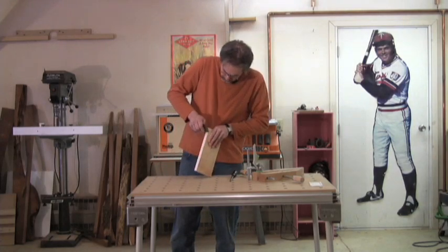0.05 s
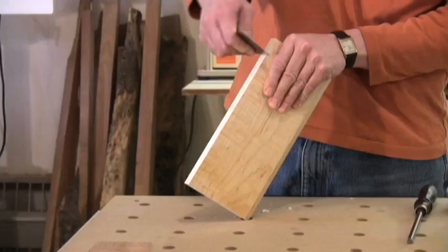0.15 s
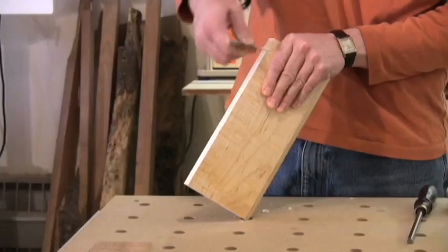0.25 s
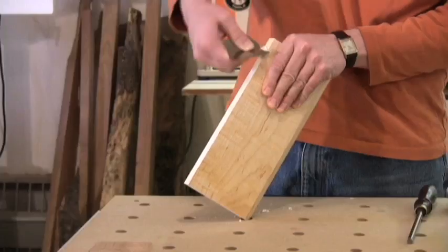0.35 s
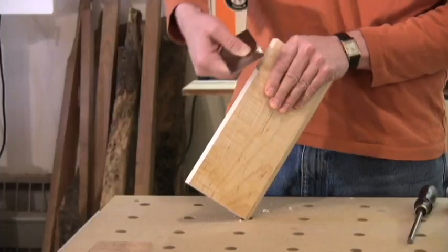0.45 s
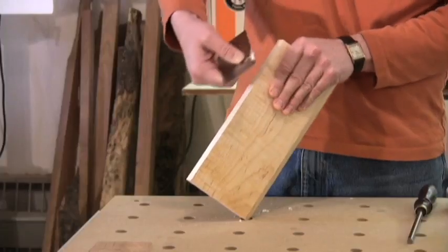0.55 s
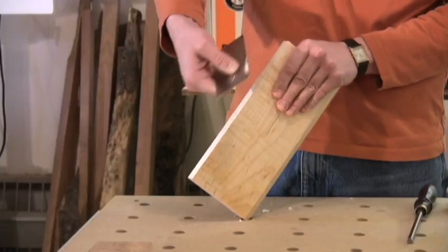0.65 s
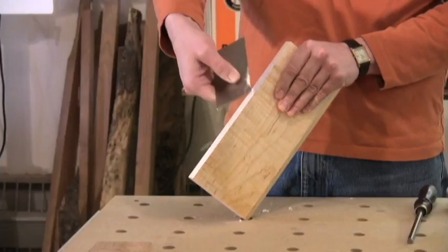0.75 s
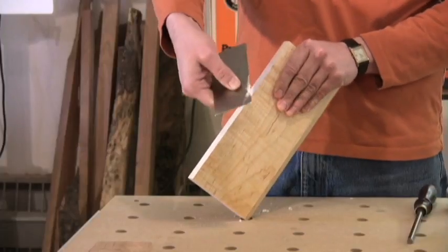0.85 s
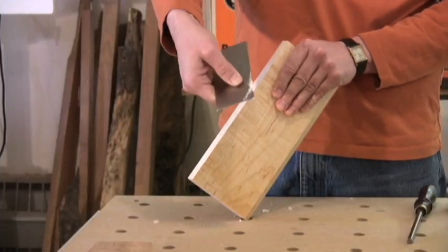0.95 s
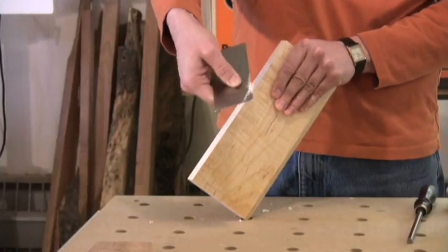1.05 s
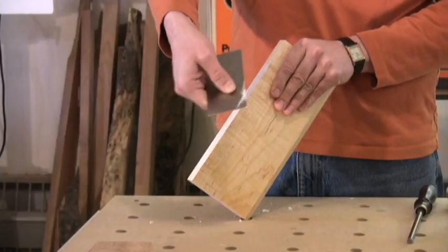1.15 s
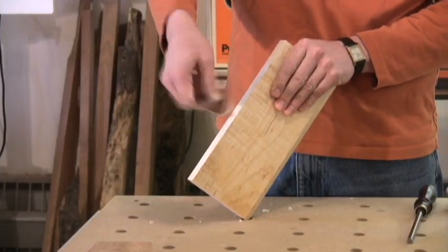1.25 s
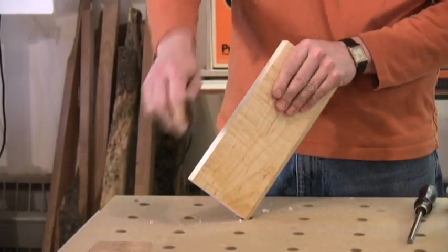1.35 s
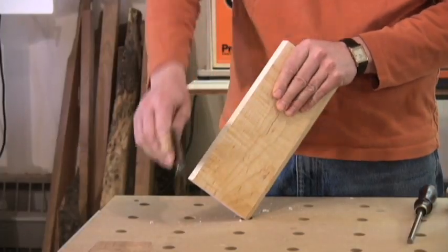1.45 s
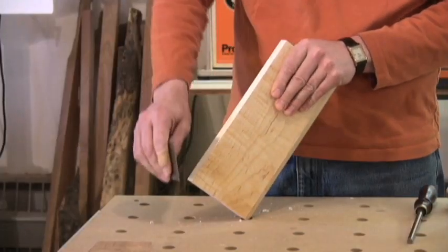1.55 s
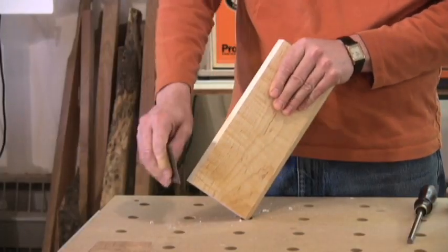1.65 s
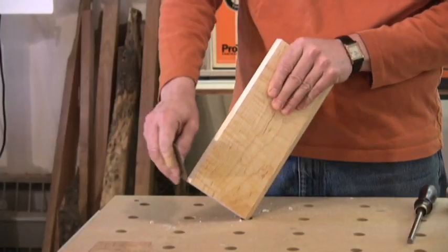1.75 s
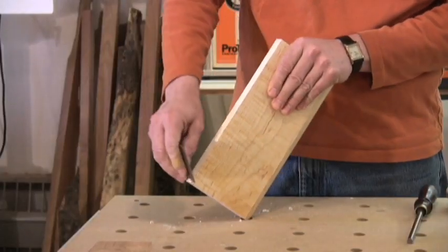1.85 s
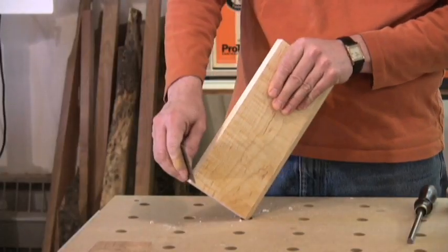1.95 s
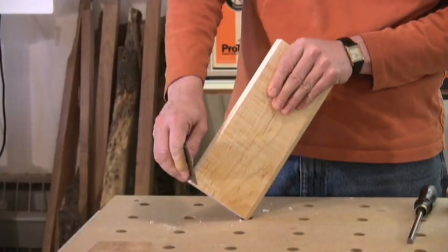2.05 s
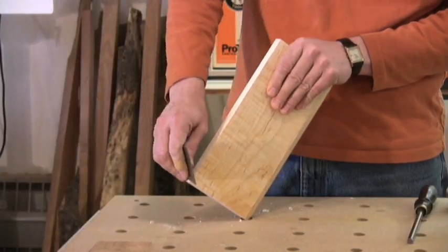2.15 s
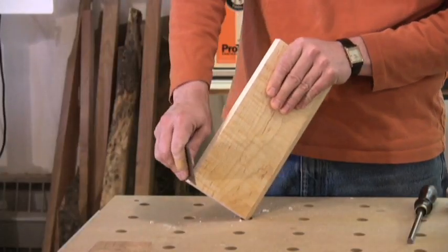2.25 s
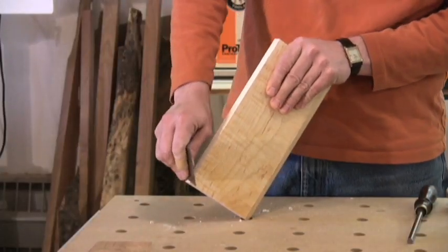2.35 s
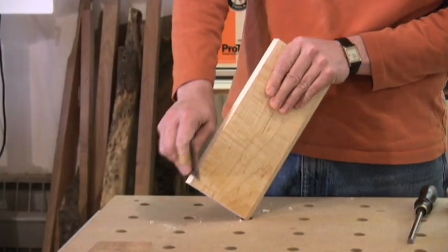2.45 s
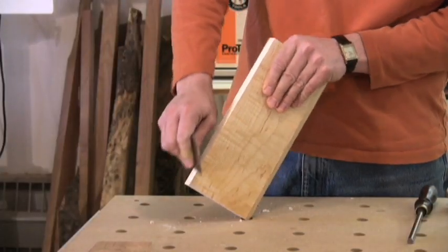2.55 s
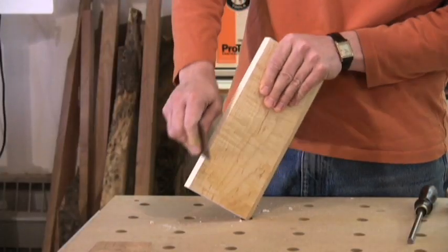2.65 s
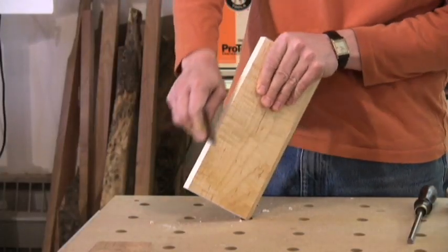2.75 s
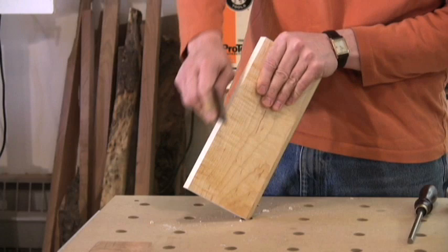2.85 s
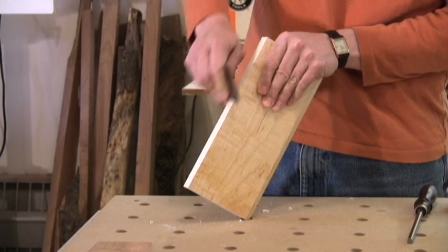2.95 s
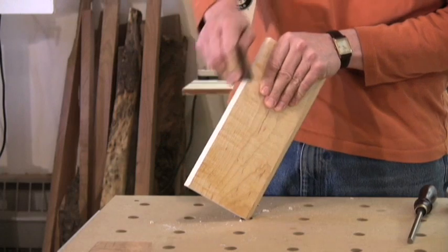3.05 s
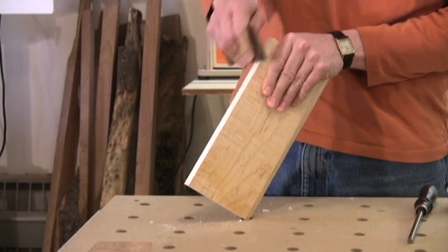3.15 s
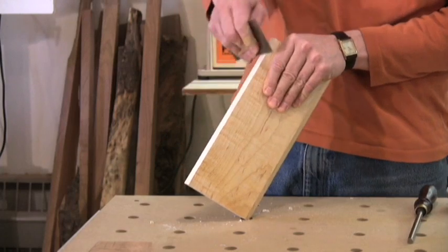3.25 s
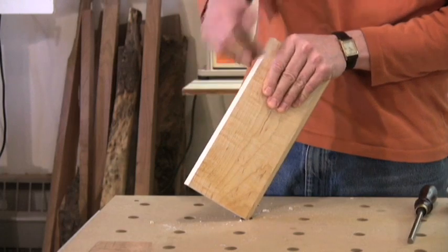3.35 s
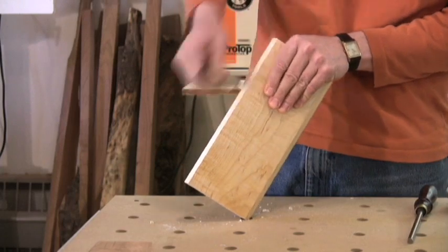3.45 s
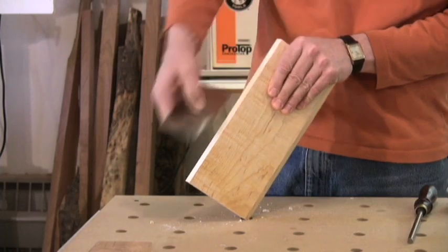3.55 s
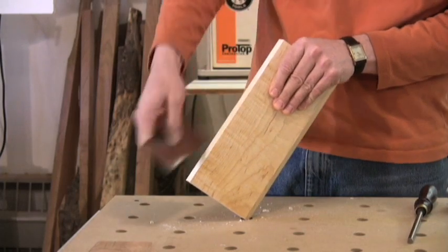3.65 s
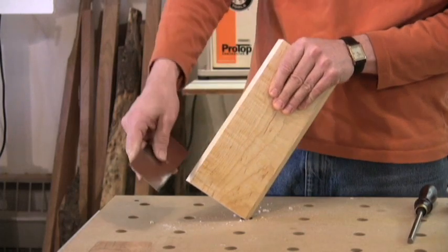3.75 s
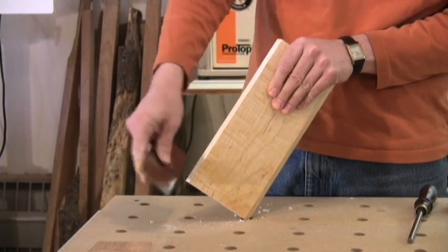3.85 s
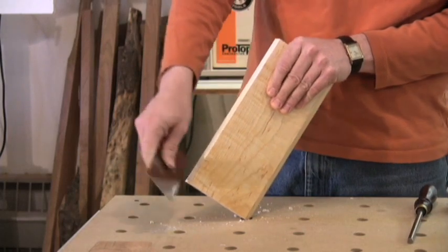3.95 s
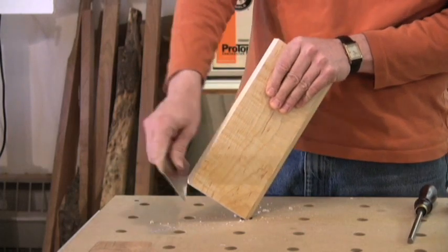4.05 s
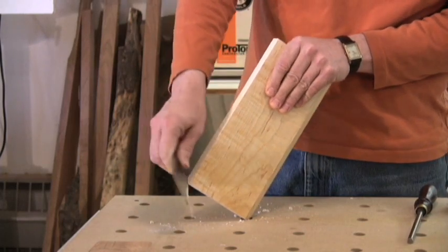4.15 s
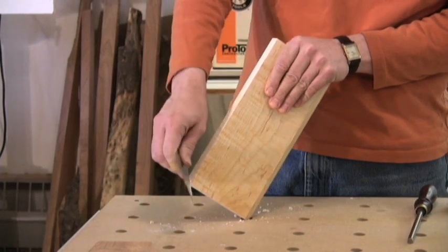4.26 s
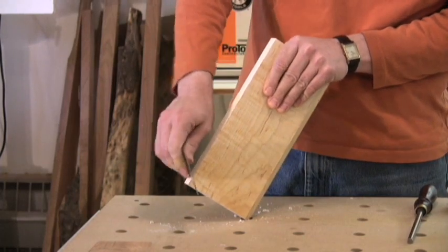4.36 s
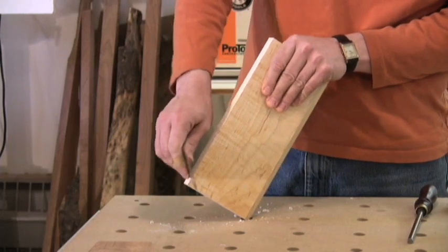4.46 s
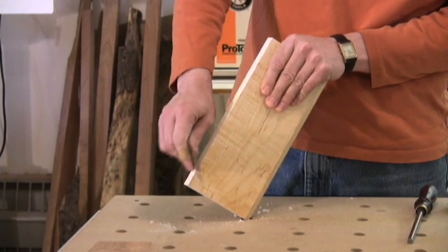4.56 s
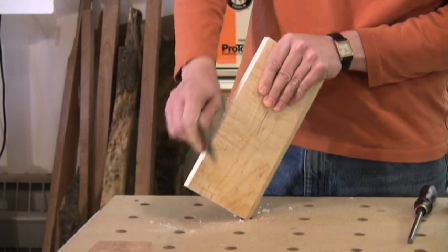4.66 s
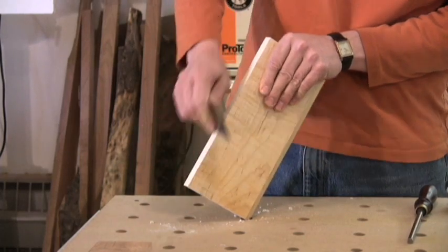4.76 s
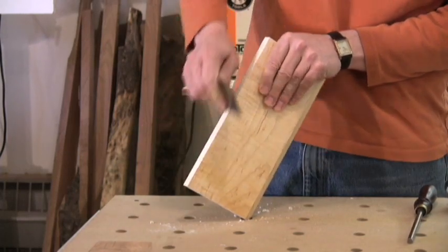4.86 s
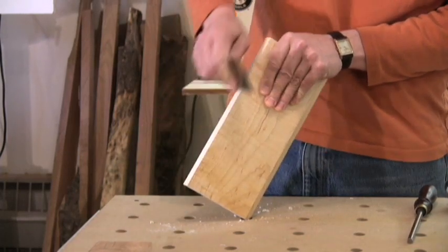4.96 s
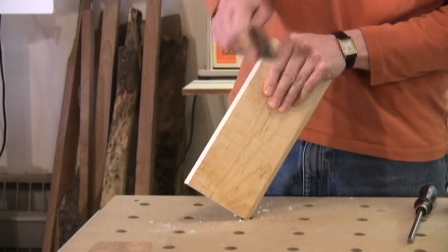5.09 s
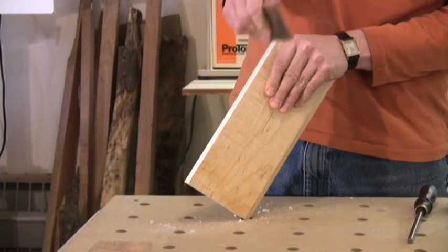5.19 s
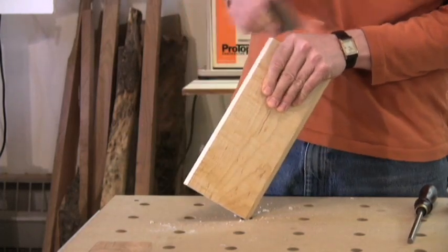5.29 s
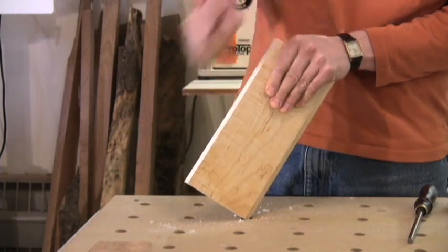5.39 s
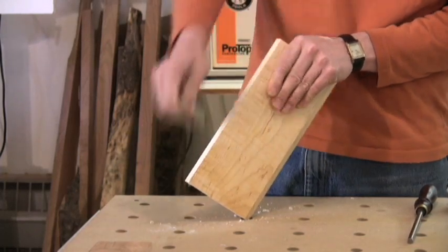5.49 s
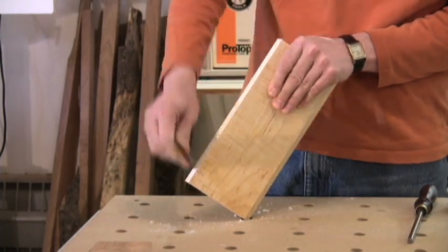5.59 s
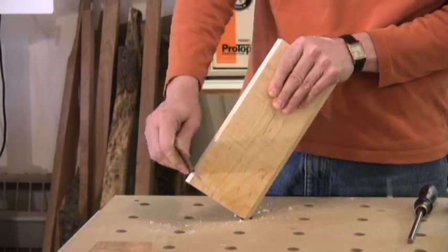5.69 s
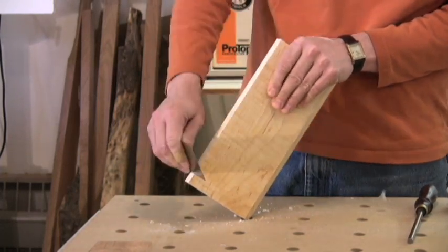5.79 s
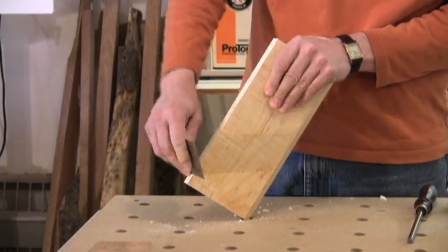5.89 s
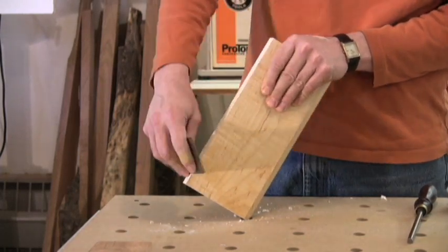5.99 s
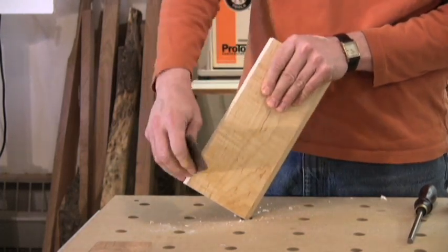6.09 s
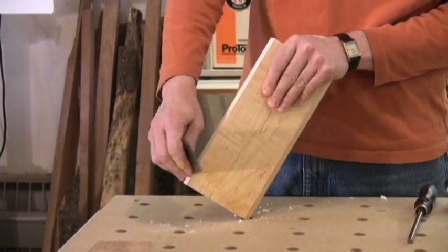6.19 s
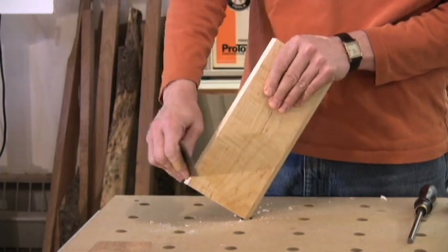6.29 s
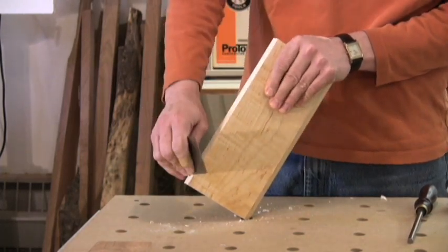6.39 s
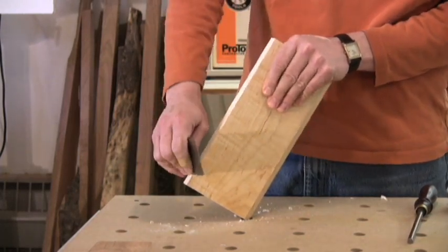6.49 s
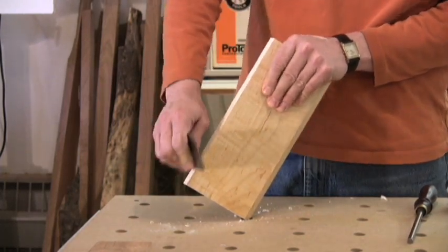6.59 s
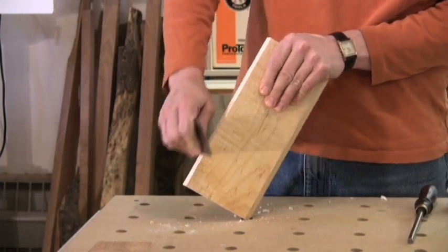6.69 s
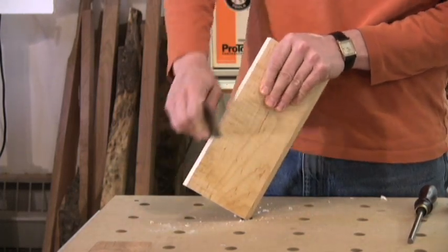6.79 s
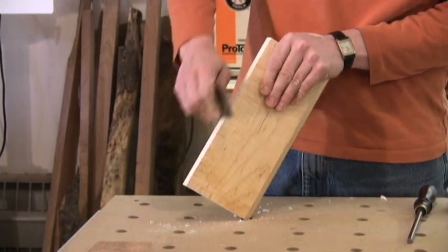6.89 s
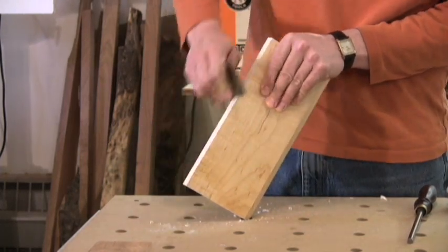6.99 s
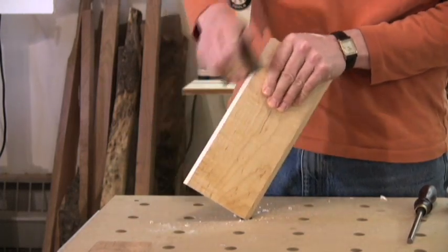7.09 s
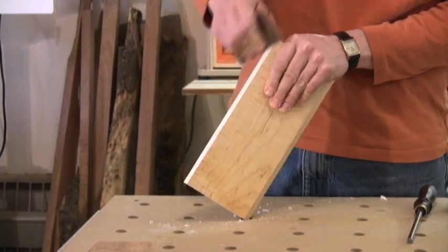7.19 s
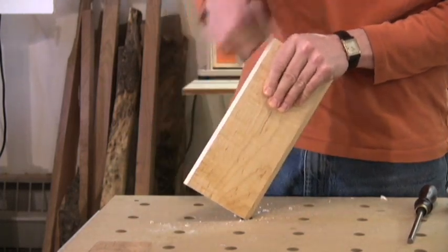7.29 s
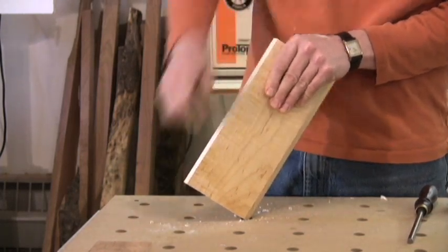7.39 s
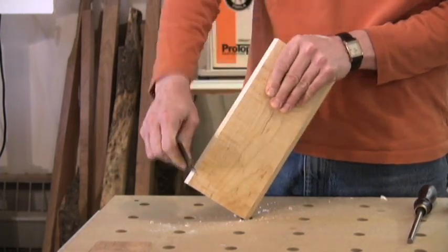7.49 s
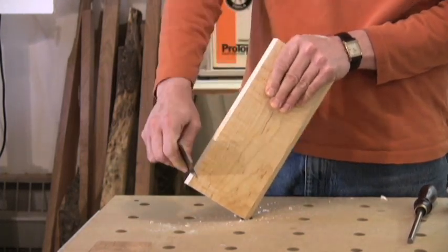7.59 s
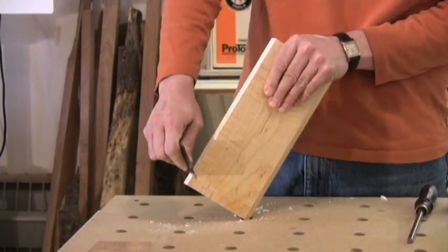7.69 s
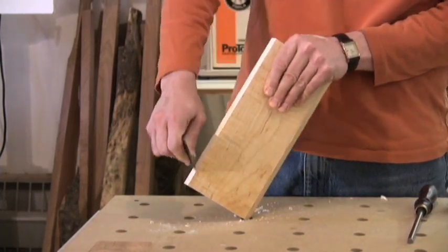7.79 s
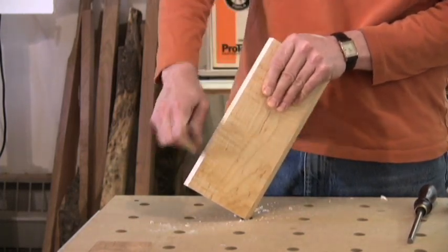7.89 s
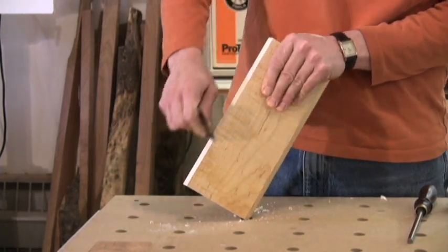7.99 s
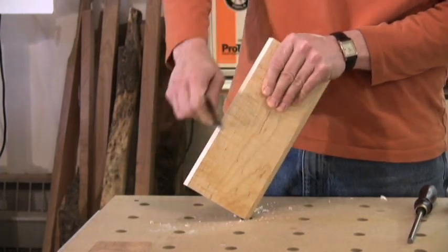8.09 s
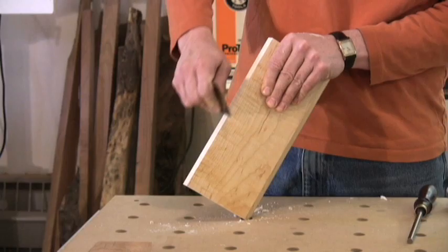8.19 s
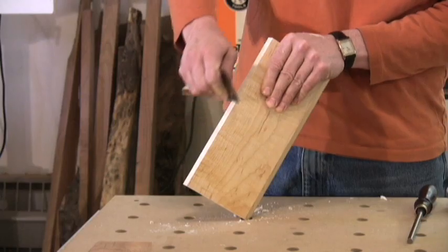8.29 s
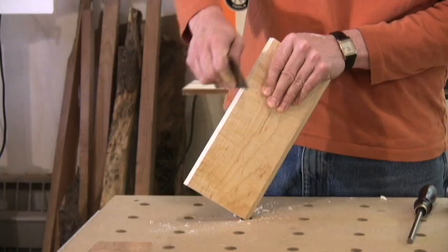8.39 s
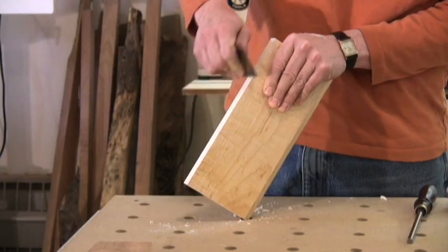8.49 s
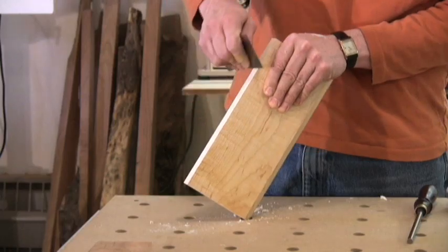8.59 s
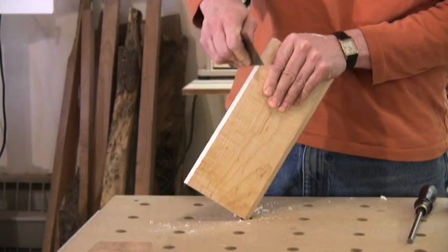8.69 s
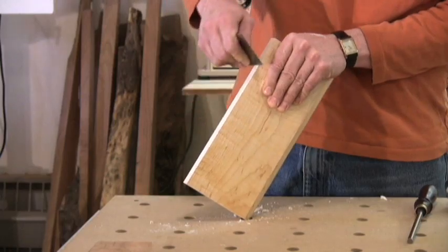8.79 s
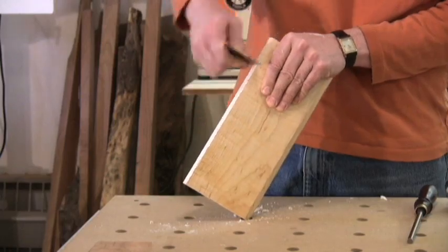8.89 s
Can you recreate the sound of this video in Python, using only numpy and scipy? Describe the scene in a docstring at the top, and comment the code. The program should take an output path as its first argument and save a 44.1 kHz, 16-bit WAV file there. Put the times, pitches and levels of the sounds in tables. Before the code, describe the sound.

A thin steel scraper rasps along a hardwood edge in four strokes, with blade knocks, small squeaks and soft clothing rustle between them, close up.

```python
"""A steel card scraper is pulled along the edge of a hardwood board that stands on a workbench.
Fibres tear in dense tiny snaps that sound the board, the flexed blade and the hissing shaving.
Around the strokes the steel knocks, chatters and squeaks on the wood, and fingers slide over it.
A close mono microphone with a fast limiter also hears clothing rustles and bumps, a faint hum,
steady air and the workshop's echo."""
import sys
import numpy as np
from scipy import signal
from scipy.fft import rfft, irfft, next_fast_len
from scipy.io import wavfile
from scipy.ndimage import uniform_filter1d, minimum_filter1d, map_coordinates

SR = 44100
rng = np.random.default_rng(int(sys.argv[2]) if len(sys.argv) > 2 else 0)


def inscribe(sig):
    """Save sig as 16-bit PCM at rate SR to the path in sys.argv[1].

    A 1-D sig is mono; a 2-D sig holds one channel per row.
    Samples are clipped to [-1, 1] before scaling.
    """
    pcm = np.round(np.clip(np.atleast_2d(sig).T, -1, 1) * 32767)
    wavfile.write(sys.argv[1], SR, pcm.astype(np.int16))


N = 394254


def amp(db):
    """Decibels to gain."""
    return 10 ** (np.asarray(db) / 20)


def unit(x):
    """Scale to rms 1."""
    return x / np.sqrt(np.mean(x ** 2) + 1e-20)


def noise(size):
    """White noise at rms 1."""
    return rng.standard_normal(size)


def along(points, hz):
    """Read (frequency [Hz], value) points on a log frequency axis."""
    f, v = np.transpose(points)
    return np.interp(np.log(hz + 1), np.log(f + 1), v)


def wobble(rate, size):
    """A smooth random curve with rate knots a second."""
    knots = rng.standard_normal(int(size * rate / SR) + 4)
    return map_coordinates(knots, [np.arange(size) * rate / SR])


def bell(offset, width):
    """A Gaussian swell that peaks at 1 where the offset is zero."""
    return np.exp(-.5 * (offset / width) ** 2)


def swells(rows):
    """A gain curve with one bell for each (time [s], level [dB], bell width [s]) row."""
    t = np.arange(N) / SR
    return sum(amp(db) * bell(t - s, width) for s, db, width in rows)


def filtered(x, response):
    """Filter x by a complex response of frequency."""
    m = next_fast_len(len(x) + SR // 4)
    return irfft(rfft(x, m) * response(np.fft.rfftfreq(m, 1 / SR)), m)[:len(x)]


def coloured(x, spectrum):
    """Shape x by a (frequency [Hz], level [dB]) spectrum, at rms 1."""
    return unit(filtered(x, lambda hz: amp(along(spectrum, hz))))


def resonate(x, modes):
    """Ring x through (frequency [Hz], width [Hz], level [dB]) resonances, at rms 1."""
    def response(f):
        return sum(amp(db) * 1j * f * w / (c * c - f * f + 1j * f * w) for c, w, db in modes)
    return unit(filtered(x, response))


def add(track, s, sound):
    """Mix a sound into the track at s seconds."""
    start = max(round(s * SR), 0)
    part = track[start:start + len(sound)]
    part += sound[:len(part)]


def peak_lift(hz, centre_hz, width_hz, lift_db):
    """Gain of a rounded boost around a centre frequency."""
    return amp(lift_db / (1 + ((hz - centre_hz) / width_hz) ** 2))


def swept(x, centre_hz, width_hz, lift_db):
    """Lift a resonance whose centre moves as the blade flexes."""
    hz, t, z = signal.stft(x, SR, nperseg=512)
    centre = np.interp(t * SR, np.arange(len(x)), centre_hz)
    z = z * peak_lift(hz[:, None], centre, width_hz, lift_db)
    return signal.istft(z, SR, nperseg=512)[1][:len(x)]


def overtones(x, spacing_hz, depth_db, drift_rate):
    """The blade's many high modes ripple the spectrum and drift as it flexes."""
    hz, t, z = signal.stft(x, SR, nperseg=1024)
    grid = np.meshgrid(hz / spacing_hz, t * drift_rate, indexing="ij")
    ripple = map_coordinates(rng.standard_normal((256, 16)), grid, mode="mirror")
    # full depth from 3 kHz up
    depth = depth_db * np.minimum(hz / 3000, 1)[:, None]
    return signal.istft(z * amp(depth * ripple), SR, nperseg=1024)[1][:len(x)]


def pull(start, length, final_db, swell_db, press_db, wood_db, shaving_db, fade, flex_at):
    """The edge bites, speeds up and lifts off: levels of cut, board and hiss, and the blade's resonance."""
    # moments when the edge loses its shaving; a negative loss is a gain:
    # (time [s], bell width [s], loss of hiss [dB], loss of cut [dB])
    lapses = [(2.572, 0.023, 9, 5), (2.748, 0.028, -3, 7), (7.835, 0.027, 24, 8), (8.05, 0.032, 13, 2),
              (8.235, .02, 8, 2)]
    bite_s, curl_s = 0.0075, 0.034  # rise of the cut; the shaving and its hiss take longer to form
    hiss_rise_db, hiss_fade = 7, 0.67  # gain of hiss over the pull; its share of the cut's fade rate
    board_arch_db = 2.5  # the board sounds most in mid-pull
    rest_hz, flex_hz, flex_share = 1974, 466, .13  # resonance, sag under the thumbs, width in pulls

    t = np.arange(0, length + 40 / fade, 1 / SR)
    way = np.minimum(t / length, 1)
    arch = np.sin(np.pi * way)

    def rise_db(rise_s):
        return 20 * np.log10(1 - np.exp(-(t + 1 / SR) / rise_s))

    lift_db = -fade * np.maximum(t - length, 0)
    cut_db = final_db + swell_db * (way - 1) + press_db * arch + rise_db(bite_s) + lift_db
    board_db = wood_db + board_arch_db * (arch - 1) + rise_db(bite_s) + lift_db
    hiss_db = shaving_db + hiss_rise_db * (way - 1) - .5 * press_db * arch
    # the hiss adds to the cut's own fade
    hiss_db = hiss_db + rise_db(curl_s) + hiss_fade * lift_db
    for s, span, hiss_loss_db, cut_loss_db in lapses:
        lapse = bell(start + t - s, span)
        hiss_db = hiss_db - hiss_loss_db * lapse
        cut_db = cut_db - cut_loss_db * lapse
    blade_hz = rest_hz - flex_hz * bell(way - flex_at, flex_share)
    return cut_db, board_db - cut_db, hiss_db, blade_hz


def stroke(row, grip, singing):
    """Tearing fibres drive the board, the flexed blade and the hiss of the shaving."""
    # resonances of the board under the moving blade: (frequency [Hz], width [Hz], level [dB])
    board_modes = [(277.8, 23, 7), (344, 68, 1.5), (453, 23, 1), (550, 38, -47), (810, 40, -26.5)]
    cut_db, board_db, hiss_db, blade_hz = pull(*row)
    size = len(cut_db)

    # the edge bites unevenly over the pores of the wood
    bite = amp(0.91 * wobble(500, size))
    snaps = bite * noise(size) * (rng.random(size) < .4)
    steel = overtones(coloured(snaps, grip), spacing_hz=110, depth_db=1.9, drift_rate=7)
    steel = filtered(steel, lambda hz: peak_lift(hz, *singing))

    # split the steel: blade below 3.2 kHz, rasp above it, hiss above 8.8 kHz
    treble = filtered(steel, lambda hz: 1 - 1 / (1 + (hz / 3200) ** 6))
    hiss = filtered(treble, lambda hz: 1 - 1 / (1 + (hz / 8800) ** 12))
    blade = filtered(steel - treble, lambda hz: 1 / (1 + (600 / (hz + 1)) ** 6))
    # a faster, cleaner cut brightens the rasp along with the hiss
    rasp = (treble - hiss) / np.std(blade) * amp(.5 * (hiss_db + 2.5) - 1.9)
    blade = unit(swept(blade, blade_hz, width_hz=330, lift_db=5))
    board = resonate(snaps, board_modes)
    board = unit(filtered(board, lambda hz: 1 / (1 + (210 / (hz + 1)) ** 4)))

    # the figure of the wood tugs at blade and board, but not at rasp and hiss
    tug = amp(1.3 * wobble(45, size))
    low = tug * (amp(-2.5) * blade + amp(board_db + 0.24) * board)
    return amp(cut_db) * (low + rasp + amp(hiss_db + 1.16) * unit(hiss))


def scraping():
    """Each pull along the edge tears fibres with the colour of its grip."""
    # pulls grouped by grip: (start [s], length [s], final cut [dB], swell over the pull [dB],
    # mid-pull pressure [dB], board [dB], final hiss relative to the cut [dB], fade [dB/s],
    # where the blade flexes most [share of the pull])
    strokes = [
        [(0.0, .045, -50, -12, -2, -51.5, -12.5, 194, 0.39),
         (.085, 0.084, -37.5, 9, -0.5, -55.5, -20.5, 1498, .1)],
        [(2.45, 0.78, -43.5, 5.5, 3, -52, -5.5, 181, 0.53), (3.282, 0.031, -46.5, 4, -0.5, -59, -3.5, 450, .1)],
        [(4.523, .73, -39, 10, 1.5, -51, -2.5, 1600, 0.4)],
        [(6.596, 0.6574, -37, 9.5, 0, -52, -5.5, 443, 0.46)],
        [(7.78, 0.83, -47.5, -5.5, 0.5, -49.5, -5, 255, 0.4),
         (8.682, 0.05, -52, 1, 0.5, -52.5, -9.5, 600, 0.54)],
    ]
    # colour set by the grip and angle of the blade, a list for each: (frequency [Hz], level [dB])
    grips = [
        [(530, -37), (900, -7), (1240, -12), (1540, -3.5), (1890, -3.5), (3020, -7), (3410, -5), (6350, -13),
         (10600, -6), (15800, -19)],
        [(530, -8), (900, -14.5), (1090, -18), (1370, -4.5), (1680, -9), (1960, -4), (2780, -10), (5000, -15),
         (7790, -24.5), (10500, -26.5), (12400, -24), (13800, -22.5), (15800, -22.5)],
        [(530, -6), (900, -5), (1030, -11.5), (1270, -2), (2010, 0.5), (2320, -1), (3320, -9.5), (3790, -11.5),
         (5310, -15), (6990, -13.5), (9210, -22.5), (13800, -16), (15800, -19)],
        [(530, -33), (900, -16), (1200, -9.5), (1350, -3), (1600, -6), (1760, -3), (3210, -11), (3840, -13),
         (5240, -13), (8070, -23), (11800, -14), (15800, -17)],
        [(410, -43), (700, -29), (862, -8), (1090, -12), (1490, -0.5), (1770, -7), (2510, -4.5), (3670, -13.5),
         (4020, -10), (5020, -11), (8120, -24), (11300, -11.5), (15800, -15)],
    ]
    # the one blade mode that sings out in each grip: (frequency [Hz], half-width [Hz], lift [dB])
    singing_modes = [(3420, 210, 3), (10640, 210, 9), (3270, 29, 11), (10300, 120, 2), (2600, 46, 4)]
    out = np.zeros(N)
    for rows, grip, singing in zip(strokes, grips, singing_modes):
        for row in rows:
            add(out, row[0], stroke(row, grip, singing))
    return out


def clothing():
    """Sleeves rustle as the arm moves, with soft bumps of a few cycles that sag in pitch."""
    # swings of the arm: (peak time [s], level [dB], bell width [s])
    sleeve = [(0.0, -51.5, 0.11), (.6, -66.5, 0.2), (1.72, -65, .2), (2.88, -60, 0.43), (5.07, -58.5, 0.47),
              (7.0, -61, 0.45), (8.35, -60, 0.33)]
    # colour of the rustle: (frequency [Hz], level [dB])
    cloth = [(20, -24), (45, -9), (75, -1.5), (150, -0.5), (260, -7), (600, -14), (2000, -23),
             (5000, -37.5), (15000, -47)]
    # low bumps of hand and clothing: (peak time [s], level [dB], time scale [s], pitch [Hz])
    bumps = [(.06, -65, 0.049, 147), (.608, -44.5, 0.0074, 108.2), (0.633, -46, 0.015, 141.8),
             (0.756, -50, 0.011, 128.7), (.79, -58, 0.045, 151.2), (1.657, -56, 0.0088, 112),
             (2.532, -50.5, 0.085, 120.8), (3.415, -41, 0.0031, 148), (3.427, -41, 0.0084, 121.5),
             (5.267, -41, 0.0064, 137.4), (5.357, -43, 0.0073, 152), (5.643, -56, 0.013, 103),
             (6.358, -47.5, 0.011, 136), (7.496, -38, 0.011, 109.1), (8.67, -48.5, 0.032, 140.6)]
    rub_colour = [(30, -7), (100, 1.0), (280, 0), (600, -20.0), (2000, -36), (8000, -55)]  # Hz, dB
    rest_db = -76  # rustle between swings

    swing = amp(rest_db) + swells(sleeve)
    out = swing * amp(2.0 * wobble(15, N)) * coloured(noise(N), cloth)
    t = np.arange(-SR // 8, SR // 8) / SR
    for s, db, length, hz in bumps:
        bend = -.15 * np.tanh(t / length) + 0.253 * wobble(121.2, len(t))
        phase = 2 * np.pi * np.cumsum(hz * np.exp(bend)) / SR
        rub = coloured(noise(len(t)), rub_colour)
        bump = (np.sin(phase) + 0.5 * rub) / np.cosh(1.13 * t / length)
        add(out, s + t[0], amp(db) * bump)
    return out


def background():
    """Steady workshop air is shaped noise; a faint machine hum is a few tones of drifting phase."""
    # colour of the air: (frequency [Hz], level [dB])
    air = [(20, -32), (60, -2), (150, -9.5), (450, -2.5), (1000, -7.5), (2000, -13), (5000, -24.5),
           (15800, -28)]
    # tones of the hum: (frequency [Hz], relative level [dB])
    hum_tones = [(441.4, -80.5), (559.9, -85.5), (1087, -87)]
    t = np.arange(N) / SR
    hum = sum(amp(db) * unit(np.sin(2 * np.pi * hz * t + 1.4 * wobble(9, N))) for hz, db in hum_tones)
    return amp(-73.5) * coloured(noise(N), air) + amp(3.0) * hum


def skids():
    """The edge skids and catches: bursts of uneven slips ring the blade around one chatter pitch."""
    # each skid: (time [s], level [dB], length [s], steel zing [dB], chatter pitch [Hz])
    slides = [(.105, -53, 0.051, 2, 2400), (1.646, -66.5, 0.013, -8, 1940), (2.509, -62, 0.2, -11, 3560),
              (2.93, -44, 0.026, -18, 2030), (3.585, -64, 0.066, -9, 1630), (3.676, -67.5, 0.0094, 3, 2500),
              (3.715, -62.5, 0.012, -1, 2330), (3.822, -54, 0.027, -17, 2123),
              (3.867, -59, 0.014, -11.5, 2170), (4.3, -38, 0.016, -20, 2110),
              (4.317, -55, 0.017, -11, 2050), (4.342, -55.5, 0.028, -17, 2150),
              (5.668, -24, 0.02, -23, 1820), (5.676, -31.5, 0.019, -36, 2480), (6.381, -54, 0.06, -9, 2106),
              (7.79, -53, 0.0064, -16, 1370), (8.094, -39.5, 0.0062, -16, 1280),
              (8.298, -41, 0.021, -16.5, 1435), (8.691, -59, 0.015, -4, 2030)]
    # the blade chattering on the wood: (frequency [Hz], width [Hz], level [dB])
    blade_modes = [(283, 15, -15), (365, 57, -5.5), (824, 155, -6), (1315, 290, -5.5), (1790, 54, 1),
                   (1950, 100, -2), (2130, 28, -1.5), (2440, 29, -6)]
    # high modes of the thin steel: (frequency [Hz], width [Hz], level [dB])
    zing_modes = [(2810, 440, 4.5), (3544, 22, 15), (4020, 70, 5), (4750, 360, 1), (5600, 130, 1),
                  (6500, 1200, -3), (10220, 620, 2), (13000, 2300, -12)]
    out, t = np.zeros(N), np.arange(SR // 5) / SR
    for s, db, length, zing_db, hz in slides:
        press = np.abs(np.sin(np.pi * np.minimum(t / length, 1))) ** 0.4
        slips = press * noise(len(t)) * amp(0.88 * wobble(633, len(t)))
        chatter = unit(press * np.sin(2 * np.pi * hz * t + 0.77 * wobble(413, len(t))))
        body = filtered(resonate(slips, blade_modes), lambda f: 1 / (1 + (f / 4500) ** 4))
        sound = body + amp(-1.0) * chatter + amp(zing_db) * resonate(slips, zing_modes)
        # the fingers damp the blade as soon as it stops
        damping = amp(-60 * np.maximum(t - length, 0) / 0.12)
        # keep the level tied to the skid's own length, not the whole buffer
        add(out, s, amp(db) * np.sqrt(length / t[-1]) * unit(sound * damping))
    return out


def squeak():
    """The edge squeaks off the corner: rough stick-slip falls in pitch and locks briefly into a tone."""
    start_s, length_s, edge_s = .212, 0.046, 0.0074  # edge: rise and fall
    first_hz, lock_hz, sag_hz_per_s = 2110, 1294, 7400  # the sag follows once locked
    lock_after_s, lock_rise_s = 0.032, 0.0014  # time to reach the lock pitch, speed of locking
    tone_db, loose_db = -29, -16.5  # locked level, and the loose level relative to it
    rasp_colour = [(500, -7), (1800, 13.0), (3100, -2), (4200, -22), (15000, -17.5)]  # Hz, dB

    out = np.zeros(N)
    t = np.arange(0, length_s, 1 / SR)
    fall = np.maximum(1 - (t / lock_after_s) ** 2, 0)
    hz = lock_hz + (first_hz - lock_hz) * fall - sag_hz_per_s * np.maximum(t - lock_after_s, 0)
    locked = .5 + .5 * np.tanh((t - lock_after_s) / lock_rise_s + 1)
    level_db = tone_db + loose_db * (1 - locked)
    press = np.minimum(np.minimum(t, t[-1] - t) / edge_s, 1)

    # the louder it sings, the steadier the slips and the clearer their octave
    loose = np.clip(1 - locked, .2, 1)
    phase = 2 * np.pi * np.cumsum(hz) / SR + 1.1 * loose * wobble(600, len(t))
    tone = np.sin(phase) + (1 - loose) * amp(-19) * np.sin(2 * phase)
    flutter = amp(4 * loose * wobble(250, len(t)))
    rasp = amp(np.minimum(level_db, -40) - 2) * coloured(noise(len(t)), rasp_colour)
    add(out, start_s, press * (amp(level_db) * flutter * unit(tone) + rasp))
    return out


def knocks():
    """The blade lands on or drops off the board: a short crack over the board's decaying modes."""
    # contacts: (time [s], level [dB], lift of the ring below 600 Hz [dB], crack [dB])
    contacts = [(.757, -51, -9, 15.5), (1.645, -57.5, 3.5, -16), (1.945, -46.5, 3.5, -21),
                (2.457, -45, 12, -5), (3.558, -46, -26, -11), (4.106, -34.5, 3, -17),
                (5.254, -19.5, -8.5, -34), (5.349, -32.5, -3, -12), (5.359, -28.5, -21, -11),
                (5.366, -19.5, -24, -7.5), (5.671, -15.5, -12, -9), (6.203, -43, -9, -9.5),
                (6.344, -34, 2.5, -14.5), (7.573, -22, -6, -38)]
    # modes of the struck board: (frequency [Hz], level [dB], 60 dB decay time [s])
    struck_modes = [(130, -10, 0.075), (268.4, -7, 0.26), (462, 2, 0.016), (802, -7.5, 0.018),
                    (1286, -4.5, 0.019), (1947, -5, 0.024), (2525, -9, 0.014), (3370, -35, 0.018)]
    # colour of the crack: (frequency [Hz], level [dB])
    edge = [(300, -24), (1500, 15.5), (3000, 11), (6000, 2.5), (9000, -16), (13000, -9), (15800, -36)]
    out, t = np.zeros(N), np.arange(SR // 3) / SR
    for s, db, ring_db, crack_db in contacts:
        ring = np.zeros(len(t))
        for k, (hz, level, t60) in enumerate(struck_modes):
            # each contact excites the modes a little differently, in alternating polarity
            mode_db = level + rng.normal(0, 3.8) + ring_db * (hz < 600)
            ring += (-1) ** k * amp(mode_db - 60 * t / t60) * np.sin(2 * np.pi * hz * t)
        crack = coloured(noise(len(t)), edge) * amp(crack_db - 60 * t / 0.013)
        onset = 1 - np.exp(-t / 0.00051)
        add(out, s, amp(db - 4.5) * (ring * onset + crack))
    return out


def fingers():
    """Dry skin whispers over the steel between strokes, as unevenly sticking shaped noise."""
    # slides that change the grip: (peak time [s], level [dB], bell width [s])
    slides = [(1.38, -81, 0.081), (1.8, -88, 0.064), (3.67, -80, 0.12), (6.078, -73, 0.096)]
    # colour of skin on steel: (frequency [Hz], level [dB])
    skin = [(1000, -17), (3000, 6), (6500, -5), (9000, -11), (10500, 1), (15800, -1)]
    stick = amp(3.5 * wobble(40, N))
    return swells(slides) * stick * coloured(noise(N), skin)


def workshop(x):
    """A diffuse echo that returns a little late and loses its treble first."""
    # decay of the room: (frequency [Hz], 60 dB decay time [s])
    decay = [(100, 1), (270, 0.94), (1800, 0.92), (4000, 0.68), (8000, 0.63), (15000, 0.18)]
    # colour of the echo: (frequency [Hz], level [dB])
    echo = [(60, -5), (270, 7), (850, 2), (2200, -4.5), (3200, -5.5), (6000, -3.5), (8500, -3.5),
            (15000, -3)]
    hz, t, z = signal.stft(noise(SR), SR, nperseg=256)
    fading = amp(-60 * t / along(decay, hz)[:, None])
    tail = signal.istft(z * fading, SR, nperseg=256)[1]
    tail = tail * (1 - np.exp(-np.arange(len(tail)) / SR / 0.005))
    wet = signal.fftconvolve(x, tail / np.linalg.norm(tail))[:N]
    return filtered(wet, lambda f: amp(along(echo, f)))


def scene():
    """The work close by and its echo, with clothing and room air, alike in both channels."""
    work = scraping() + knocks() + skids() + squeak() + fingers()
    mono = work + amp(-16.0) * workshop(work) + clothing() + background()
    return np.array([mono, mono])


def limited(x, ceiling_db, hold_s):
    """A very fast limiter turns peaks down towards the ceiling."""
    size = max(int(hold_s * SR), 3)
    need = np.minimum(1, amp(ceiling_db) / (np.abs(x) + 1e-9))
    held = minimum_filter1d(need, size, axis=-1)
    return x * uniform_filter1d(held, size, axis=-1)


def record(dry):
    """The microphone's limiter, rounded clipping and steep treble limit."""
    top_hz = 15830
    held = limited(dry, ceiling_db=-25.0, hold_s=0.00019)
    clipped = held / (1 + np.abs(held / amp(-25.3)) ** 6) ** (1 / 6)
    return np.array([filtered(channel, lambda hz: 1 / (1 + (hz / top_hz) ** 300)) for channel in clipped])


dry = scene()
out = record(dry)
inscribe(out)
```